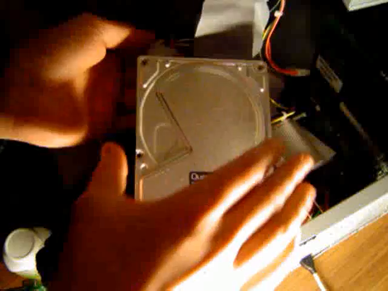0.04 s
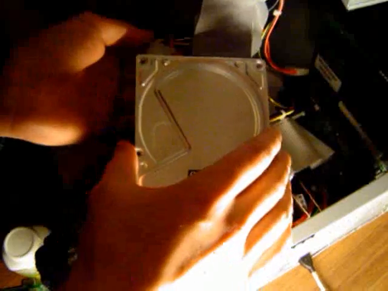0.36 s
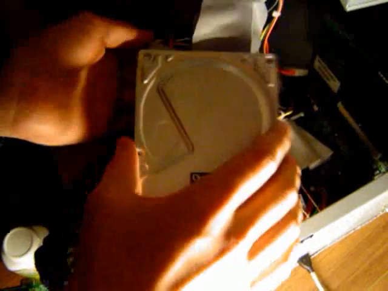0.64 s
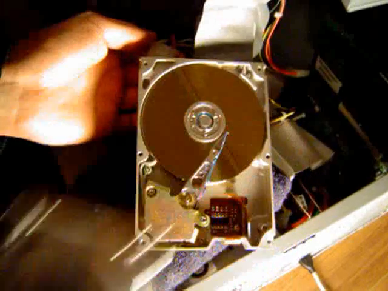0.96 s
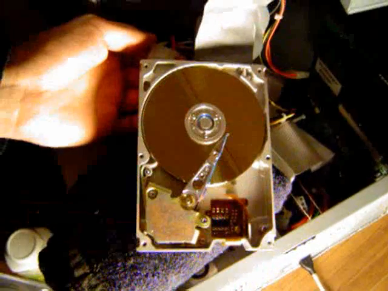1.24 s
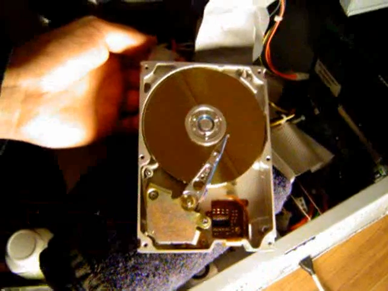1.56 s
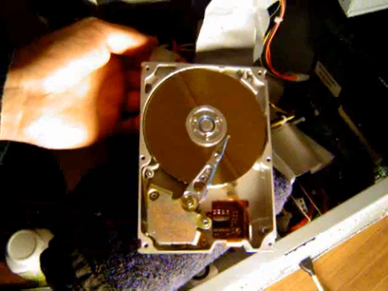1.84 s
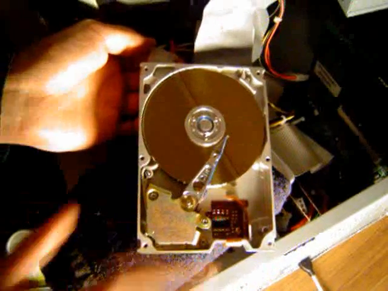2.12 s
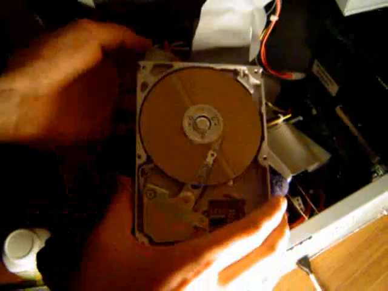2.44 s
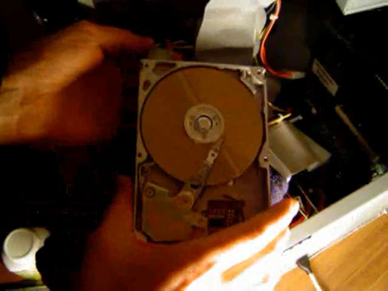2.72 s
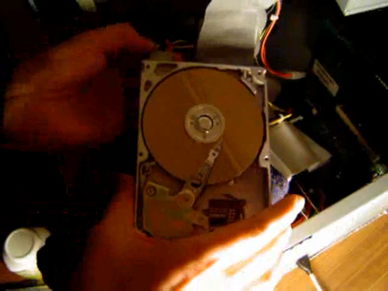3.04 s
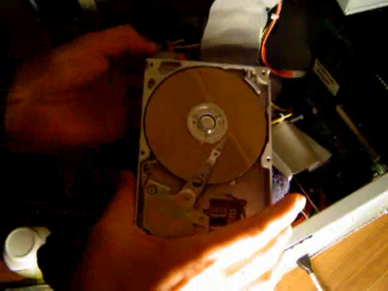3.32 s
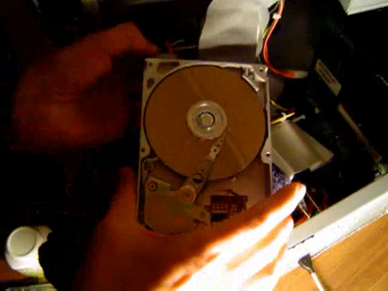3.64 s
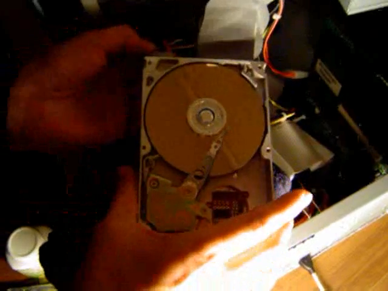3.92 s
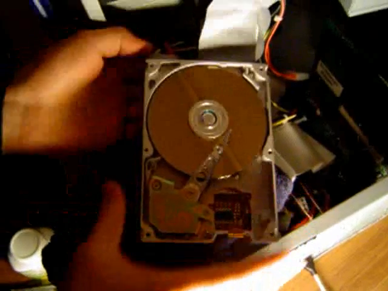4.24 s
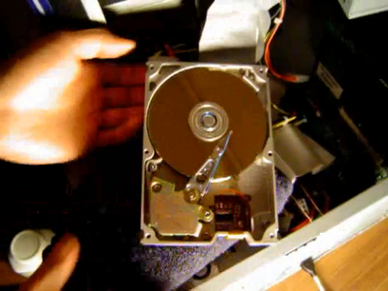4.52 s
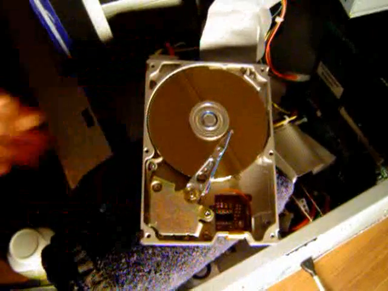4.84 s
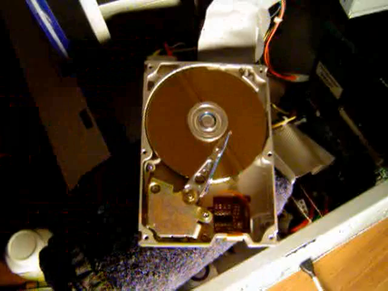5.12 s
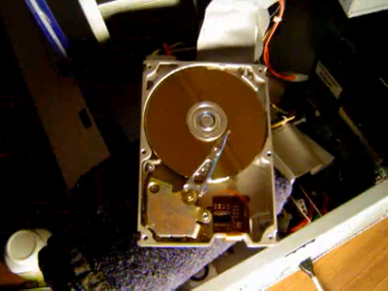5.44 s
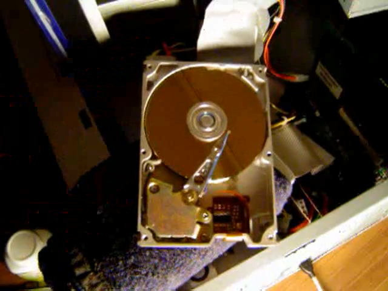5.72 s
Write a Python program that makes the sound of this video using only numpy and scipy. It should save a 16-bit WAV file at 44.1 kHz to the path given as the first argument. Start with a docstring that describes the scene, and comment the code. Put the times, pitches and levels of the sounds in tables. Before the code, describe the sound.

A hard drive's steel cover clatters down, a plug clicks in, and the motor stutters and spins up with a rising whir.

```python
"""A small room, one microphone close above a hard drive; beside it a computer runs throughout.
Fingers brush the drive, then its steel cover is laid aside, bouncing and ringing on its edges.
After three seconds the power plug clicks home; the spindle motor stutters, then spins up in a rising whir
as coil pulses and ball bearings ring the chassis. Near the end the power cuts and the platters coast."""
import sys
import numpy as np
from scipy import signal
from scipy.fft import rfft, irfft
from scipy.io import wavfile
from scipy.ndimage import uniform_filter1d

SR = 44100
rng = np.random.default_rng(int(sys.argv[2]) if len(sys.argv) > 2 else 0)


def store_pcm(level_fs):
    """Save levels as 16-bit WAV."""
    pcm = np.round(np.clip(level_fs, -1, 1) * 32767).astype(np.int16)
    wavfile.write(sys.argv[1], SR, np.atleast_2d(pcm).T)


N = 258867
TIME = np.arange(N) / SR
FREQ = np.arange(N + 1) * SR / (2 * N) + 1e-6

# spectrum of the computer's fan air: pitch_hz, gain_db
FAN_AIR = [(25, -30.5), (60, -21.5), (100, -3), (165, -9), (230, 4), (400, -0.5), (600, 3), (800, -7),
           (1300, -10.5), (2200, -9), (3400, -15.5), (5000, -19), (6500, -23.5), (10000, -31)]
# resonances of the computer case: pitch_hz, width_hz, level_db
CASE_MODES = [(224.8, 31.5, -51), (314, 40, -62), (584, 87, -60), (682, 83, -56.5), (1026, 415, -55),
              (8250, 1200, -68.5)]
# steady background tones, low mains hum first, then wavering fan tones: pitch_hz, level_db, waver_db
BACKGROUND_TONES = [(48.8, -54, .3), (89.2, -64, 2.5), (316.9, -48.5, 1.9), (664, -60, 1.8),
                    (738.4, -62.5, 3.6), (1024, -68.5, 1.9), (1558, -65, 1.1), (3184, -69.5, 1.2)]
# low 120 Hz hum of a second, spinning drive: time_s, level_db
SECOND_DRIVE_HUM = [(0.1, -59.5), (1.22, -53), (3.22, -51.5), (4.82, -58.5), (5.71, -72), (5.87, -69)]
# slides of skin on metal: start_s, length_s, level_db, tilt_db_per_octave
SLIDES = [(0.443, 0.044, -51, 4.5), (1.143, 0.066, -33.5, 18.5), (1.885, 0.037, -37, 14.5),
          (3.207, 0.0098, -39.5, 9), (3.334, 0.015, -42, 5.5)]
# spectrum of a slide: pitch_hz, gain_db
SLIDE_SPECTRUM = [(400, -22), (1100, 1), (2200, 11), (3300, 1), (5500, -6.5), (10000, -24)]
# clicks of the plug and the mechanism: start_s, level_db, crack_t60_s, knock_db
CLICK_EVENTS = [(0.471, -49.5, .04, 2), (3.049, -29, 0.026, -22), (3.203, -38.5, 0.043, -35),
                (3.3052, -15, 0.031, -18), (3.402, -49, .02, 6), (3.411, -31.5, 0.016, -4),
                (3.42, -38, 0.028, 12), (3.4297, -26.5, 0.015, 3), (3.96, -40, .04, 7),
                (5.512, -35.5, 0.13, -22)]
# spectrum of a click's crack: pitch_hz, gain_db
CRACK_SPECTRUM = [(150, -32), (300, -18.5), (700, -5), (1250, -10), (2000, -7), (2600, 0), (3100, 6),
                  (4100, -13.5), (5000, -6), (7000, -12.5), (10000, -16.5)]
# modes that a click rings: pitch_hz, gain_db, t60_s
PLUG_MODES = [(604, -20.5, 0.39), (1110, 0, 0.024), (1326, -8, 0.058), (1700, -4, 0.033),
              (2990, 3.5, 0.025), (3310, 11, 0.021), (3790, -10.5, 0.04), (5010, -9, 0.053),
              (6400, -7, 0.02), (7350, -16.5, 0.047)]
# the cover drops on an edge: start_s, level_db, thud_db, scrape_db, loss_per_bounce_db
COVER_LANDINGS = [(1.754, -22, -6, -8, 15), (1.764, -26, -2, -39, 2), (1.771, -30, -16, 4, 35),
                  (1.786, -18.5, -14, -21, 2), (1.822, -17.5, -13, -28, 14), (1.941, -26.5, 1, -13.5, 11.5),
                  (1.976, -27, -4, -19, 3.5)]
# spectrum of the cover's thud: pitch_hz, gain_db
THUD_SPECTRUM = [(80, -13), (180, -30), (320, 6), (440, -16), (590, 4), (850, -6), (1050, -8), (1300, -8),
                 (2200, -4), (3200, -23.5), (6000, -45)]
# modes of the steel cover: pitch_hz, gain_db, t60_s
COVER_MODES = [(290, -19, 0.25), (365, 2.5, 0.28), (522, -14, 0.13), (578, 0.5, 0.6), (630, 3, 0.067),
               (646, -3, 0.38), (751, 4.5, 0.31), (810, -4, 0.1), (1025, 11.5, 0.17), (1430, -16, .22),
               (1510, -4, 0.28), (1735, -6, 0.39), (1930, -22, .2), (1910, -12, 0.29), (2140, -13, .12),
               (2280, -3, 0.079), (2480, -12, 0.12), (2600, -24, .15)]
# the motor's tries at starting: start_s, kick_gap_s, first_kick_db
START_TRIES = [(3.472, .0064, -22), (3.513, .0068, -23.5), (3.558, .011, -24)]
# resonances of the drive chassis: pitch_hz, width_hz (widened to at least 140), coil_db, bearing_db
CHASSIS_MODES = [(1640, 93, -8.5, -10.5), (2500, 350, -9.5, -3.5), (3062, 103, 4, 0), (3420, 142, 8, 2.5),
                 (3600, 117, 4.5, 1.5), (3990, 350, -3, -8), (4700, 260, -8, -15), (5040, 83, -0.5, -1.5),
                 (6180, 100, -35, -10.5), (7370, 57, -33, -10), (8320, 130, -24, -13.5),
                 (9000, 400, -23, -19.5)]
# spectrum of the air dragged by the platters: pitch_hz, gain_db
WIND_SPECTRUM = [(150, -21), (400, -12), (1200, -10.5), (2200, -2.5), (4000, -1), (10000, -21)]
# spectrum of the coils' switching sizzle: pitch_hz, gain_db
SIZZLE_SPECTRUM = [(4000, -29), (6100, -16.5), (6800, -1.5), (7400, -15), (7700, -6.5), (8050, 1.5),
                   (8600, -12), (9100, 2), (9400, -3), (9800, 9), (10300, -30), (11000, -29)]

POWER_S, TURN_S, CUT_S = 3.465, 3.63, 5.553  # power comes on, the rotor breaks free, power is cut
RATED_TURNS_S, SPIN_UP_TURNS_S2, SETTLE_S, COAST_TURNS_S2 = 60, 21.05, 2.05, 3.3
COIL_CYCLES, BALL_PASSES = 7, 8  # per turn
REST_CYCLE, CONDUCTING_SHARE = .79, 1 / 3  # in a coil cycle: where the rotor rests, how long a coil is on


def undb(db):
    """Decibels to gain."""
    return 10 ** (np.asarray(db) / 20)


def unit(x):
    """Scale to rms 1."""
    return x / np.sqrt(np.mean(x ** 2))


def shape(x, response):
    """Filter with a response given on FREQ."""
    return irfft(rfft(x, 2 * N) * response)[:N]


def colour(points):
    """Response through (pitch_hz, gain_db) points."""
    hz, db = np.transpose(points)
    return undb(np.interp(np.log(FREQ), np.log(hz), db))


def resonance(hz, width_hz):
    """Response of one damped resonance, gain 1 at its centre."""
    return 1 / (1 + 1j * (FREQ ** 2 - hz ** 2) / (FREQ * width_hz))


def noise(response):
    """Coloured noise of rms 1."""
    return unit(shape(rng.standard_normal(N), response))


def wander(rate_hz):
    """Smooth random drift of rms 1."""
    hold = int(SR / rate_hz)
    steps = np.repeat(rng.standard_normal(N // hold + 1), hold)
    return unit(uniform_filter1d(uniform_filter1d(steps, hold), hold)[:N])


def fade(t, t60):
    """Exponential decay, 60 dB down after t60 seconds."""
    return np.exp(-np.log(1000) * t / t60)


def add(track, start_s, sound):
    """Mix a sound in at a time."""
    i = int(start_s * SR)
    track[i:i + len(sound)] += sound[:N - i]


def computer():
    """Fan air in a resonant case, low mains hum, wavering fan tones and a second drive's hum."""
    out = undb(-46.5) * noise(colour(FAN_AIR)) * undb(0.12 * wander(6.9))
    for hz, width_hz, db in CASE_MODES:
        out += undb(db) * noise(resonance(hz, width_hz) ** 2)
    for hz, db, waver_db in BACKGROUND_TONES:
        cycles = np.cumsum(hz * (1 + 0.00127 * wander(8))) / SR
        out += np.sqrt(2) * undb(db + waver_db * wander(13)) * np.sin(2 * np.pi * cycles)
    # a thin whine lasts the first second, and a high whistle wanders throughout
    out += undb(-62.5) * np.clip((1.05 - TIME) / 0.11, 0, 1) * np.sin(2 * np.pi * 3470 * TIME)
    whistle_hz = np.interp(TIME, [.9, 1.15], [8170, 8380]) + 70 * wander(25)
    out += undb(-68) * np.sin(2 * np.pi * np.cumsum(whistle_hz) / SR)
    hum_db = np.interp(TIME, *np.transpose(SECOND_DRIVE_HUM))
    return out + np.sqrt(2) * undb(hum_db) * np.sin(2 * np.pi * 120 * TIME)


def fingers():
    """Skin brushes metal in short slides that catch and slip."""
    out = np.zeros(N)
    octaves = np.log2(np.maximum(FREQ, 500) / 3000)
    for start_s, length_s, db, tilt_db in SLIDES:
        attack = np.clip((TIME - start_s) / 0.0026, 0, 1)
        release = fade(np.maximum(TIME - start_s - length_s, 0), 0.01)
        hiss = noise(colour(SLIDE_SPECTRUM) * undb(tilt_db * octaves))
        stick_slip = unit(undb(5.4 * wander(250)))
        out += undb(db) * attack * release * hiss * stick_slip
    return out


def ring(modes, t, scatter_db):
    """Struck modes; every contact point weights them differently."""
    hz, db, t60 = np.transpose(modes)[:, :, None]
    size = undb(db + scatter_db * rng.standard_normal(db.shape))
    waves = size * fade(t, t60) * np.sin(2 * np.pi * (hz * t + rng.random(db.shape)))
    return waves.sum(0) / np.sqrt(np.sum(size ** 2))


def clicks():
    """Hard plastic snaps: a short crack, a few quick modes and a duller knock of the body behind."""
    out, t = np.zeros(N), TIME[:SR // 4]
    crack = noise(colour(CRACK_SPECTRUM))
    knock = noise(colour([(100, -26), (250, -10), (600, 2), (1200, 3.5), (2200, 3),
                          (4000, -14), (10000, -57)]))
    for start_s, db, t60, knock_db in CLICK_EVENTS:
        here = slice(int(start_s * SR), int(start_s * SR) + len(t))
        snap = undb(-1) * crack[here] * fade(t, t60) + undb(4.5) * ring(PLUG_MODES, t, scatter_db=2)
        snap += undb(knock_db) * knock[here] * fade(t, 0.022)
        add(out, start_s, undb(db) * snap / np.std(snap[t < .005]))  # level set by the first 5 ms
    return out


def bounces(count, first_gap_s=.009, gap_ratio=.9):
    """The contacts of each landing of the cover, each sooner and weaker than the last."""
    for start_s, db, thud_db, scrape_db, loss_db in COVER_LANDINGS:
        for k in range(count):
            yield start_s, db - k * loss_db, thud_db, scrape_db
            start_s += first_gap_s * gap_ratio ** k


def cover():
    """The steel cover lands on its edges and rattles: a thud, a scrape and ringing modes per contact."""
    out, t = np.zeros(N), TIME[:SR // 2]
    thud = noise(colour(THUD_SPECTRUM))
    scrape = noise(colour([(1500, -15), (4000, 10), (6000, 7), (10000, -5.5)]))
    attack = 1 - np.exp(-t / 0.00062)
    for start_s, db, thud_db, scrape_db in bounces(count=4):
        here = slice(int(start_s * SR), int(start_s * SR) + len(t))
        blow = undb(thud_db) * thud[here] * fade(t, 0.089)
        blow += undb(-11.5) * ring(COVER_MODES, t, scatter_db=3.5)
        blow += undb(scrape_db) * scrape[here] * fade(t, 0.026)
        add(out, start_s, undb(db) * blow * attack)
    return out


def stutter(kicks, swell_db):
    """The coils kick the resting rotor in swelling bursts; the current hisses faintly from power-on."""
    out = undb(-57.5) * (TIME > POWER_S) * rng.standard_normal(N)
    for start_s, gap_s, db in START_TRIES:
        for k in range(kicks):
            add(out, start_s + k * gap_s, undb(db + k * swell_db)[None])
    return out


def chassis(struck_by):
    """Response of the well damped casting to "coils" or "bearings"; it radiates little bass."""
    response = 0
    for k, (hz, width_hz, coil_db, bearing_db) in enumerate(CHASSIS_MODES):
        db = coil_db if struck_by == "coils" else bearing_db
        response += (-1) ** k * undb(db) * resonance(hz, max(width_hz, 140))
    response /= 1 + (900 / np.maximum(FREQ, 1)) ** 2
    return response / np.sqrt(np.mean(abs(response) ** 2))


def spin():
    """Turns per second, and coil current 0-1: full, then choked by the motor's own voltage, then cut."""
    knee_speed = RATED_TURNS_S - SPIN_UP_TURNS_S2 * SETTLE_S  # the current starts to fall here
    driven_s = np.clip(TIME, TURN_S, CUT_S) - TURN_S
    current = np.exp(-np.maximum(driven_s - knee_speed / SPIN_UP_TURNS_S2, 0) / SETTLE_S)
    run_up = np.minimum(SPIN_UP_TURNS_S2 * driven_s, knee_speed)
    settling = (RATED_TURNS_S - knee_speed) * (1 - current)
    coasting_loss = COAST_TURNS_S2 * np.maximum(TIME - CUT_S, 0)
    return run_up + settling - coasting_loss, current * (TIME < CUT_S)


def pulses(cycles, scatter_db):
    """One pulse at each whole cycle, shared between two samples; even power at any rate."""
    sizes = undb(scatter_db * rng.standard_normal(N))
    i = np.flatnonzero(np.diff(np.floor(cycles)) > 0)
    step = cycles[i + 1] - cycles[i]
    early = cycles[i + 1] % 1 / step
    out = np.zeros(N)
    out[i] += early * sizes[i] / np.sqrt(step)
    out[i + 1] += (1 - early) * sizes[i] / np.sqrt(step)
    return out


def switching(cycles, second_db):
    """A coil switches twice a cycle, a little unevenly: strong even and weak odd overtones."""
    first = pulses(cycles, scatter_db=-0.8)
    second = undb(second_db) * pulses(cycles + .504, scatter_db=2.3)
    return 0.7 * (first + second)


def coils(turns):
    """A coil pulls when switched on, then lets go: paired ticks that merge into a whine."""
    cycles = REST_CYCLE + COIL_CYCLES * turns + .001 * wander(300)
    pull = switching(cycles, second_db=0)
    release = switching(cycles - CONDUCTING_SHARE, second_db=-3)
    return pull - release + undb(-15) * rng.standard_normal(N)


def bearings(turns, pace):
    """The balls slip a little as they roll over a slightly rough race, and ring the chassis."""
    passes = undb(-1) * pulses(BALL_PASSES * turns + .005 * wander(300), scatter_db=1.5)
    roughness = undb(-7) * rng.standard_normal(N)
    return shape(undb(-42) * pace ** 0.97 * (passes + roughness), chassis("bearings"))


def motor():
    """Coils and bearings strike the chassis in step with the spindle; the platters drag air along."""
    speed, current = spin()
    turns = np.cumsum(speed) / SR
    pace = speed / 30  # 1 at 30 turns per second
    ticks = coils(turns)
    strength = np.sqrt(pace) * current ** 0.61
    force = stutter(kicks=4, swell_db=2.95) + undb(-39.5) * strength * ticks
    whine = shape(force, chassis("coils"))
    rolling = bearings(turns, pace)
    wind = undb(-46) * pace ** 2 * noise(colour(WIND_SPECTRUM))
    # the switching edges add a bright sizzle once the rotor runs
    edges = unit(shape(ticks + undb(2) * rng.standard_normal(N), colour(SIZZLE_SPECTRUM)))
    sizzle = undb(-53.5) * strength * np.clip(speed / 15, 0, 1) * edges
    return whine + rolling + wind + sizzle


def room(x, near_db, tail_db, t60):
    """Quick reflections off desk and case, then the short tail of the room."""
    t = TIME[:SR // 2]
    decays = np.array([fade(t, 0.038), fade(t, t60)])
    near, tail = rng.standard_normal((2, len(t))) * (t > .001) * decays
    echoes = undb(near_db) * near / np.linalg.norm(near) + undb(tail_db) * tail / np.linalg.norm(tail)
    return x + signal.fftconvolve(x, echoes)[:N]


def scene():
    """Everything as it reaches one microphone close above the drive."""
    handling = room(cover() + clicks() + fingers(), near_db=-15, tail_db=-24, t60=.35)
    spindle = room(motor(), near_db=-10, tail_db=-15, t60=.25)
    return (handling + undb(1) * spindle + computer())[None]


def record(dry):
    """The microphone opens after a moment and cuts off steeply just above 10 kHz."""
    open_s, top_hz = .042, 10100
    opened = dry * np.clip((TIME - open_s) / 0.0033, 0, 1)
    return signal.sosfilt(signal.ellip(12, .2, 80, top_hz, fs=SR, output="sos"), opened)


dry = scene()
out = record(dry)
store_pcm(out)
```